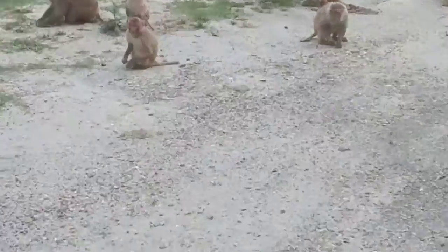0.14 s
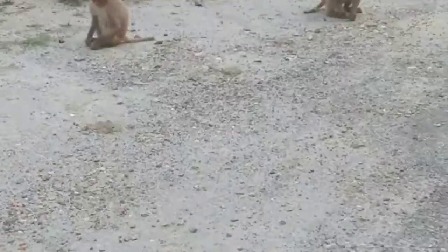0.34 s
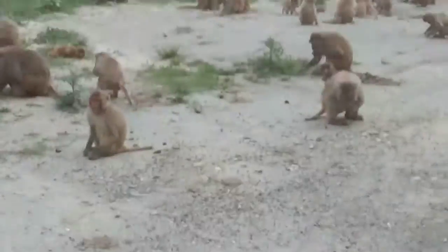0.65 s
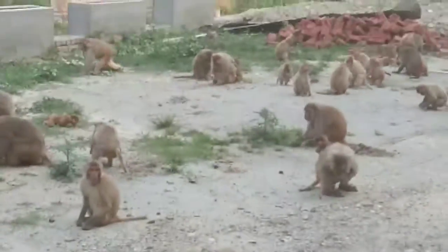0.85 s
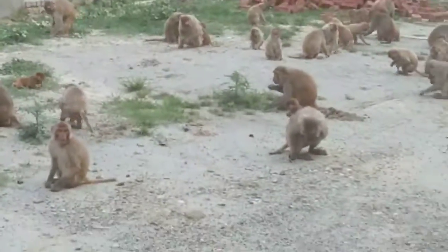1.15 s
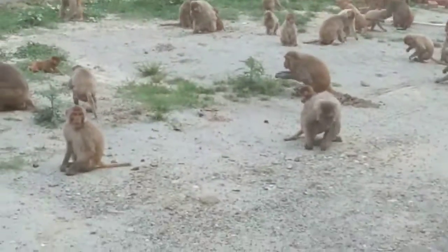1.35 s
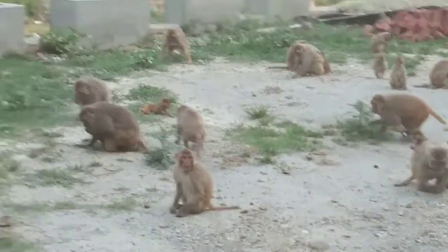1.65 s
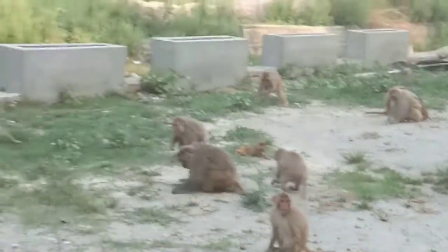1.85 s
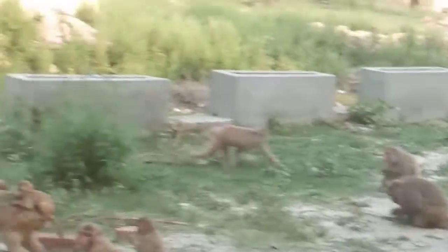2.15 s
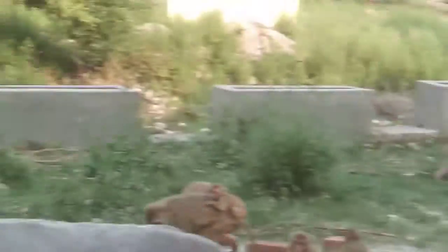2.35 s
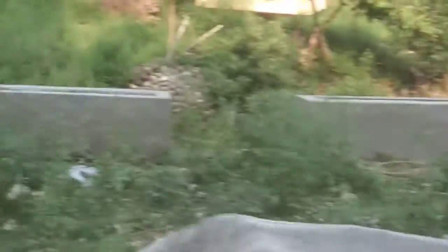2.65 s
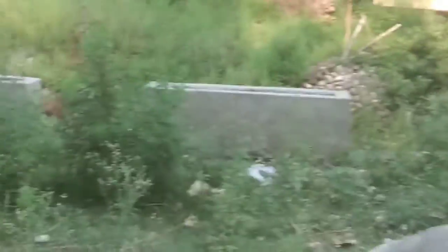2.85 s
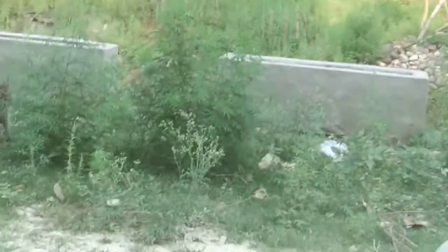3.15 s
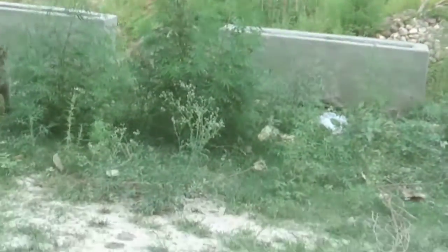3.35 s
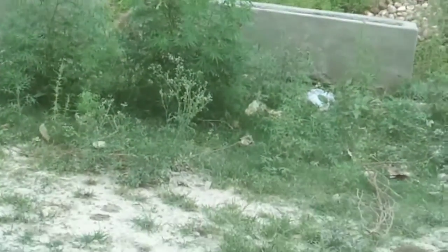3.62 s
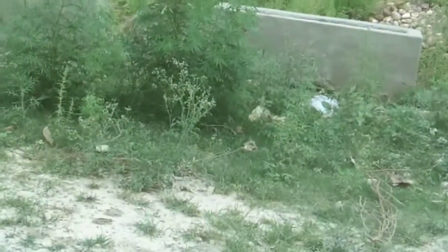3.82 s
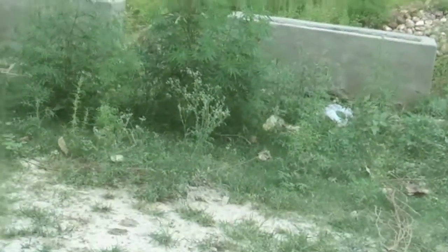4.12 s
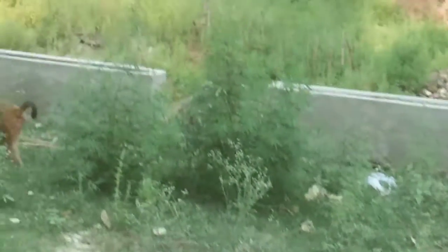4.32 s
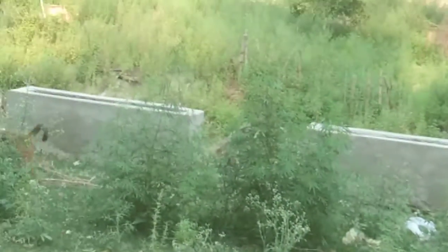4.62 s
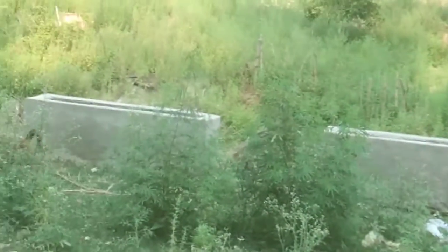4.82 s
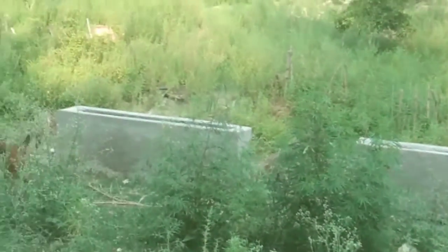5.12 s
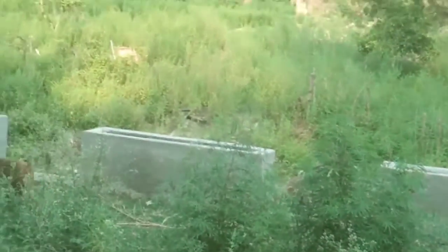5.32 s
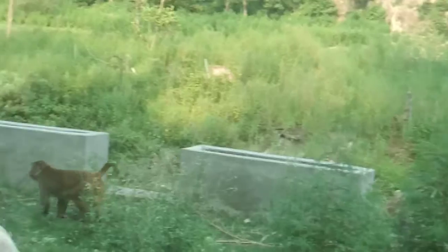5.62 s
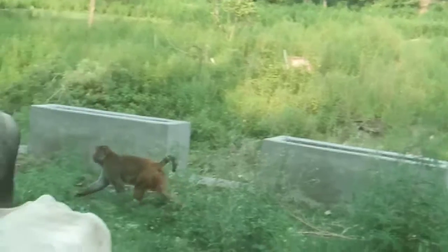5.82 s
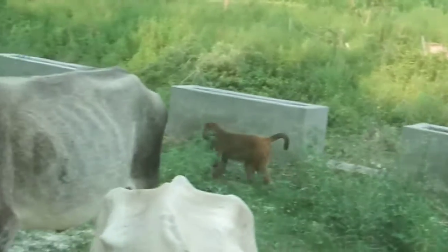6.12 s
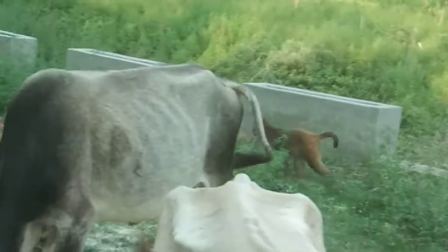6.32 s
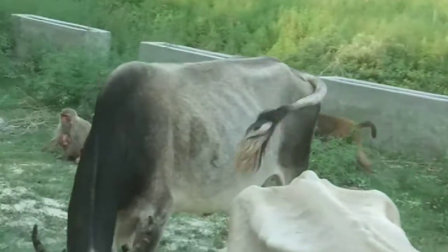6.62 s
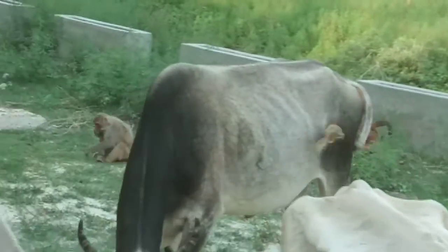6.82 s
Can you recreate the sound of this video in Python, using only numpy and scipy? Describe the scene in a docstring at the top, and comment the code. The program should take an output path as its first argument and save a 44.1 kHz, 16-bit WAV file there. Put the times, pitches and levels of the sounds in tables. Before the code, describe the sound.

A monkey troop quarrels outdoors, close to a mono microphone, over steady leafy hiss, faint rumble and tiny dry crackles. A harsh, torn scream is already under way at 0 and falls by 0.25, with feet scuffling in dirt. Wavering raspy screeches follow at 0.35-0.6, 0.7-1.2 and 1.3-1.55, a soft low grunt near 1.2. A short hoarse bark hits around 1.6 beneath another squeal, then a faint grunt at 1.8. Clearer arching squeals come at 1.95-2.2 and 2.55-2.7, a twig snap at 2.9, then single falling squeals at 3.7 and 4.55. From 4.8 to 6.1 distant whines and hoarse coos swell, peaking near 5.4, with small yips, raspy chatter and piercing squeaks around 5.55. Quiet follows, with yips at 6.25 and 6.4, scuffling, a snap and chatter near 6.65, a needle-high squeak at 6.8 and a last yip at 6.9. Hard ground and bushes add slight echoes.

```python
"""Monkey troop quarrel

A troop quarrels on open ground by a road: harsh screeches, a bark, then clear arching squeals.
Screams are fold partials that roughness splits into streaks; the bark is pulses through resonances.
Squeaks, whines and coos are gliding tones, yips and chatter tiny rough screams, grunts low hums.
Feet, stalks and air are shaped noise; ground, walls and bushes return a bounce and a faint tail.
"""
import sys
import numpy as np
from scipy import signal
from scipy.fft import rfft, irfft, next_fast_len
from scipy.io import wavfile
from scipy.ndimage import uniform_filter1d

SR = 44100
rng = np.random.default_rng(int(sys.argv[2]) if len(sys.argv) > 2 else 0)


def dump_mix(stems):
    """Bounce the given channels to the path in sys.argv[1] as a 16-bit WAV at rate SR."""
    frames = np.atleast_2d(stems).T  # one column per channel
    limited = np.clip(frames, -1, 1)  # hard clip at full scale
    pcm = np.round(limited * 32767).astype(np.int16)
    wavfile.write(sys.argv[1], SR, pcm)


N = 307377

# Short screams and squeals. Each row: start in seconds, length in seconds, starting, top and final
# pitch in Hz, fall, swell and release times in seconds, fundamental and overtone levels in dB before
# the level contour, mouth resonance in Hz, gain above EDGE_FROM_HZ in dB.
SCREAMS = [(-.02, 0.27, 1600, 1728, 1215, 0.058, 0.15, 0.043, -22.5, -21.5, 4740, 1),
           (1.524, 0.26, 2600, 2522, 1640, 0.067, 0.29, 0.039, -36, -29, 6560, 0),
           (1.955, 0.25, 2250, 2680, 1510, 0.23, 0.0482, 0.053, -33, -28, 6040, 4),
           (2.557, 0.15, 2270, 2405, 1176, 0.054, 0.089, 0.042, -34.5, -26.5, 5940, 8.5),
           (3.695, .248, 2250, 2494, 1147, 0.18, 0.046, 0.071, -31.5, -21.5, 6250, -5),
           (4.54, 0.2, 1990, 2115, 967, 0.11, 0.05, 0.074, -31, -21.5, 6140, -4)]
# Long wavering screeches, one list each. Each row: time in seconds, pitch in Hz, fundamental level
# in dB, overtone level in dB, mouth resonance in Hz.
SCREECHES = [
    [(.348, 1975, -43, -36, 6340), (.43, 2497, -26, -24.5, 3250), (.488, 2341, -18.5, -22.5, 4200),
     (.51, 2240, -28, -19, 3850), (.575, 1661, -31, -21, 5040), (.605, 1310, -79, -37, 4200)],
    [(.683, 1341, -41, -37.5, 4040), (.72, 2859, -40, -30, 5940), (.785, 2388, -19, -28.5, 6640),
     (.808, 2650, -31.5, -38, 6940), (.825, 2386, -16.5, -38.5, 5850), (.92, 2311, -24, -23, 4100),
     (1.035, 2407, -19, -30, 5500), (1.105, 2690, -36.5, -33.5, 6650), (1.143, 1970, -25.5, -32.5, 4350),
     (1.18, 1393, -41.5, -48, 4340)],
    [(1.277, 1540, -35, -46, 5850), (1.315, 2060, -27.5, -31, 6600), (1.365, 2556, -31.5, -31.5, 6700),
     (1.56, 2755, -50.5, -40, 6600)],
]
# Folds tear into chaos. Each row: start in seconds, length in seconds, roughness added (0-1).
TEARS = [(-.05, 0.235, 0.85), (0.19, 0.04, 0.3), (0.334, 0.23, 0.47), (0.727, 0.082, 0.38),
         (0.85, 0.19, 0.5), (1.037, .16, 0.1), (1.25, 0.065, 0.7), (1.319, 0.44, 0.48), (2.005, 0.06, 0.56),
         (2.07, .12, .12)]
# Folds slip into strong-weak cycles. Each row: centre in seconds, width in seconds, half-line level in dB.
SLIPS = [(2.669, 0.012, -11), (3.815, 0.067, -18), (4.584, 0.0082, -6)]
# Brief flicks of pitch. Each row: centre in seconds, width in seconds, shift as a share of the pitch.
FLICKS = [(3.731, 0.03, -0.17), (4.596, 0.0114, -.08)]
# One hoarse bark. Each row: time in seconds, pitch in Hz, level in dB,
# hoarseness (half the ratio of noise to pulses).
BARK = [(1.55, 317.2, -49, .3), (1.584, 386.3, -18, 0.2), (1.604, 421.8, -20, 0.52),
        (1.63, 340.7, -24, 1.76), (1.67, 267, -47, 0.69)]
# Barking throat at the highest pitch. Each row: resonance in Hz, width of each of two passes in Hz,
# gain in dB.
BARK_THROAT = [(767, 550, 9), (1570, 310, 16), (2216, 305, 18.5), (3830, 570, 8)]
# Piercing squeaks. Each row: start in seconds, length in seconds, four evenly spaced pitches in Hz,
# level in dB and octave level relative to it in dB, both before the swell cut and throat filter.
SQUEAKS = [(5.53, 0.05, 5400, 6120, 5470, 5230, -23, 6), (5.56, 0.13, 3350, 5380, 5370, 2900, -34, 23),
           (6.795, .108, 5100, 6160, 5970, 4050, -23, 20)]
# Short falling yips. Each row: start in seconds, length in seconds, starting pitch in Hz, peak level in dB.
YIPS = [(4.796, 0.045, 1860, -39.5), (5.258, 0.021, 1500, -36), (5.584, 0.034, 2753, -29),
        (6.246, 0.037, 2222, -33.5), (6.416, 0.049, 2714, -38), (6.907, 0.045, 2627, -26.5)]
# Spells of raspy chatter. Each row: start in seconds, length in seconds, peak level of each squeak in dB.
CHATTERS = [(5.42, .27, -41), (6.65, .13, -41.5)]
# Soft closed-mouth grunts. Each row: start in seconds, length in seconds, mid pitch in Hz, level in dB.
GRUNTS = [(1.197, 0.075, 242.5, -39.5), (1.799, 0.086, 172.8, -43)]
# Distant whines. Each row: start in seconds, length in seconds, four evenly spaced pitches in Hz,
# level in dB, overtone tilt in dB per natural log of the order.
WHINES = [(4.92, 0.38, 1412, 1354, 1285, 970, -46.5, 5), (5.11, 0.15, 771, 880, 1059, 1270, -45, -6.5),
          (5.265, 0.11, 730, 825, 970, 1148, -42, -5), (5.39, 0.18, 1508, 1514, 1327, 1150, -42, 7),
          (5.925, 0.23, 561.6, 784, 815, 941, -43.5, -1.5)]
# Scuffling feet. Each row: start in seconds, length in seconds, level in dB.
SCUFFLES = [(-.2, 0.83, -41), (0.682, 0.43, -44.5), (1.29, 0.26, -46.5), (4.359, 0.13, -57.5),
            (4.765, 0.2, -45), (5.721, 0.27, -51), (6.217, 0.24, -47.5), (6.627, 0.18, -40.5)]
# Twig and pebble snaps. Each row: time in seconds, tick level in dB before noise and filter.
SNAPS = [(2.902, -48.5), (6.644, -43.5)]
# Filter shapes of throat, whining throat, feet in dirt, and air. Each row: frequency in Hz, gain in dB.
THROAT = [(900, -29), (2200, 3), (3300, 8), (5000, 5), (7400, 7), (8500, -7.5), (11000, -22), (15500, -40)]
WHINE_THROAT = [(900, 9), (2000, 4.5), (4000, 7.5), (6500, 13.5), (10500, -16), (15000, -47)]
FEET = [(50, -32.5), (160, -2), (400, -7.5), (900, -14), (7000, -27), (11000, -55)]
AIR = [(25, -28), (70, 11.5), (160, 12), (1200, 7), (2300, 7.5), (3500, 8), (7200, 15), (9000, -3.5),
       (12000, -15)]

BAND_LIMIT_HZ = 15800
EDGE_FROM_HZ = 6800
SCOOP_S, FALL_POWER = 0.032, 1.7
ATTACK_S, LOW_SWELL_DB, HIGH_SWELL_DB, SAG_DB_PER_S = 0.012, 20, 19.5, 24.5
RELEASE_DB, CHOKE_S, CLOSING_DB = 26, 0.029, 19
CALM_ROUGH, TEAR_S = 0.05, 0.06
CHATTER_PER_S, CHATTER_HZ, CHATTER_S = 72, 3220, 0.02  # mid pitch and mid length
WHINE_SWELL_DB = 4.5
COO_FROM_S, COO_TO_S, COO_PEAK_S, COO_PER_S = 4.85, 6.0, 5.42, 16
COO_DB, COO_FADE_DB_PER_S, COO_HZ, COO_S = -43, 46, 1018, 0.19  # peak level, mid pitch and length


def scream(s, length, start_hz, top_hz, end_hz, fall_s, swell_s, release_s,
           low_db, high_db, mouth_hz, edge_db):
    """One arch of pitch swells, sags, then chokes and trails off; torn folds are bright from the start."""
    t, hz = contour(s, length, start_hz, top_hz, end_hz, fall_s)
    rough = tearing(s + t)
    unswollen = np.clip(1 - t / swell_s, 0, 1)
    release = 1 - np.exp(-(np.maximum(t - length + release_s, 0) / CHOKE_S) ** 2)
    fade_db = SAG_DB_PER_S * np.maximum(t - swell_s, 0) + RELEASE_DB * release
    # the falling pitch favours the fundamental
    closing = np.clip((t - length) / fall_s + 1, 0, 1) * (1 - rough)
    low = low_db - LOW_SWELL_DB * unswollen - fade_db + CLOSING_DB * closing
    high = high_db - HIGH_SWELL_DB * unswollen * (1 - rough ** 2) - fade_db
    _, cry = voice(s, hz, low, high, rough, mouth_hz)
    edged = colour(cry, [(EDGE_FROM_HZ, 0), (EDGE_FROM_HZ + 1, edge_db)])
    return s, edged * np.minimum(t / ATTACK_S, 1)


def contour(s, length, start_hz, top_hz, end_hz, fall_s):
    """Time and pitch of a scream: scoop to the top, hold, fall ever faster, with brief flicks."""
    t = np.arange(int(length * SR)) / SR
    scoop = np.exp(-(t / SCOOP_S) ** 2)
    fall = np.clip((t - length) / fall_s + 1, 0, 1) ** FALL_POWER
    flick = sum(share * np.exp(-(2 * (s + t - at) / width) ** 2) for at, width, share in FLICKS)
    hz = top_hz + (start_hz - top_hz) * scoop + (end_hz - top_hz) * fall
    return t, hz * (1 + flick)


def screech(rows):
    """A long cry whose pitch and strength waver while the mouth resonance moves."""
    s, (hz, low, high, mouth_hz) = curves(rows)
    return voice(s, hz, low, high, tearing(s + np.arange(len(hz)) / SR), mouth_hz)


def tearing(t):
    """Roughness of the folds: calm, except where they tear."""
    rough = CALM_ROUGH
    for at, length, added in TEARS:
        rough = rough + added * np.clip(0.5 + np.minimum(t - at, at + length - t) / TEAR_S, 0, 1)
    return rough


def voice(s, hz, low_db, high_db, rough, mouth_hz, jitter=0.0734, jitter_hz=700, unrest_db=4.5,
          smear_hz=800, torn_hz=50, quaver=0.00886, rasp=10, mouth_width_hz=1000, mouth_db=12,
          rattle_share=0.14, rattle=2.8, rattle_unrest=0.07):
    """Tight folds whistle; driven hard, a slower second flutter splits each overtone into streaks."""
    n, rough = len(hz), np.clip(rough, 0, 1)  # 0 is a clean whistle, 1 a screech
    t = s + np.arange(n) / SR
    phase = 2 * np.pi * np.cumsum(hz * (1 + quaver * wander(n, torn_hz))) / SR
    flutter_hz = rattle_share * hz * (1 + rattle_unrest * wander(n, torn_hz))
    flutter = 2 * np.pi * np.cumsum(flutter_hz) / SR

    def partial(order, split):
        """One band of the fold motion with its sidebands, each with its own unrest."""
        stray_hz = hz * jitter * rough * np.sqrt(order) * wander(n, jitter_hz)
        turn = order * phase + 2 * np.pi * np.cumsum(stray_hz) / SR
        sides = 0
        for k in (-2, -0.84, 1, 2):
            side = np.cos(turn + k * flutter + 2 * np.pi * rng.random())
            sides = sides + side * wander(n, torn_hz) / abs(k)
        return (np.cos(turn) + split * sides) * amp(unrest_db * wander(n, torn_hz))

    torn = np.maximum(rough - CALM_ROUGH, 0)
    # strong-weak cycles, heard as lines halfway between the overtones
    slip = rough ** 2
    for at, width, db in SLIPS:
        slip = slip + amp(db) * np.exp(-(2 * (t - at) / width) ** 2)
    split = rattle * torn
    folds = sum(partial(k, split) + slip * partial(k - 0.5, split) for k in range(2, 9))
    turbulence = rasp * rough ** 1.5 * rng.standard_normal(n)
    throat = colour(folds + turbulence, THROAT)
    overtones = steady(throat + amp(mouth_db) * resonate(throat, mouth_hz, mouth_width_hz))
    # torn folds also smear the fundamental into a breathy band
    width_hz = smear_hz * rough.max()
    breathy = steady(resonate(resonate(rng.standard_normal(n), hz, width_hz), hz, width_hz))
    whistle = steady(partial(1, torn / np.sqrt(3)))
    fundamental = steady(np.sqrt(1 - torn ** 2) * whistle + torn * breathy)
    return s, amp(low_db) * fundamental + amp(high_db) * overtones


def bark(jitter=0.0294, jitter_hz=470, shut=0.415, top_hz=4800):
    """Low pulses ring the open throat, then turn hoarse as the pitch drops and the mouth closes."""
    s, (hz, db, hoarse) = curves(BARK)
    n = len(hz)
    phase = 2 * np.pi * np.cumsum(hz * (1 + jitter * wander(n, jitter_hz))) / SR
    drive = unit(stack(phase, hz, np.arange(1, 20))) + 2 * hoarse * rng.standard_normal(n)
    mouth = 1 + shut * (hz / hz.max() - 1)  # scales the resonances down with the pitch
    throat = 0
    for f, width_hz, gain_db in BARK_THROAT:
        ring = resonate(resonate(drive, f * mouth, width_hz), f * mouth, width_hz)
        throat = throat + amp(gain_db) * ring
    lowpass = signal.butter(4, top_hz, fs=SR, output="sos")
    return s, amp(db) * steady(signal.sosfilt(lowpass, throat))


def squeak(s, length, *row, swell_db=7, unrest_db=2, unrest_hz=80):
    """A piercing, almost pure glide far above the usual pitch, strongest near its end."""
    *pitches_hz, db, octave_db = row
    u, hz, phase = glide(length, pitches_hz)
    cut_db = swell_db * (3 - u)  # eases as the squeak proceeds
    tone = colour(np.cos(phase) + amp(octave_db - cut_db) * np.cos(2 * phase), THROAT)
    level = amp(db - cut_db + unrest_db * wander(len(u), unrest_hz))
    return s, tone * level * signal.windows.tukey(len(u), 0.25)


def yip(s, length, hz, db, rough=0.66, fade_db=15, rise_s=0.0034, drop=0.4,
        fundamental_db=-3, mouth_hz=6800):
    """A tiny rough scream that drops in pitch as it dies."""
    t = np.arange(int(length * SR)) / SR
    level = db - fade_db * np.interp(t, [0, rise_s, length], [1, 0, 1])
    return voice(s, hz * (1 - drop * t / length), level + fundamental_db, level, rough, mouth_hz)


def chatter(s, length, db):
    """A quick spatter of tiny rough squeaks, of random pitch and length."""
    starts = np.arange(s, s + length, 1 / CHATTER_PER_S)
    for at, (late, long, high) in zip(starts, rng.random((len(starts), 3))):
        hz = CHATTER_HZ * 2 ** (high - 0.5)
        yield yip(at + late / CHATTER_PER_S, CHATTER_S * (0.5 + long), hz, db, rough=0.4)


def grunt(s, length, hz, db, overtone_db=-23.02, rise=0.15):
    """A nearly pure low hum that rises through its mid pitch."""
    n = int(length * SR)
    phase = 2 * np.pi * np.cumsum(hz * (1 + rise * np.linspace(-1, 1, n))) / SR
    hum = np.sin(phase) + amp(overtone_db) * stack(phase, hz, np.arange(2, 5))
    return s, amp(db) * unit(hum) * np.sin(np.linspace(0, np.pi, n))


def whine(s, length, *row, patchy_db=4, patchy_hz=16):
    """A thin far cry glides and swells; its overtones lose alignment and swell unevenly on the way."""
    *pitches_hz, db, tilt_db = row
    u, hz, phase = glide(length, pitches_hz)
    folds = 0
    for k in range(1, 13):
        level = amp(tilt_db * np.log(k) + patchy_db * wander(len(u), patchy_hz))
        folds = folds + level * stack(phase + 2 * np.pi * rng.random(), hz, [k])
    swell = amp(db - WHINE_SWELL_DB * (1 - u) ** 2)
    return s, swell * steady(colour(folds, WHINE_THROAT)) * signal.windows.tukey(len(u), 0.35)


def coos(arch=0.12, slope=0.28, spread_octaves=0.78, overtone_db=-11):
    """A tangle of hoarse, far coos: arched tones of random pitch and lean that swell to a peak and fade."""
    starts = np.arange(COO_FROM_S, COO_TO_S, 1 / COO_PER_S)
    for s, (late, long, high, lean) in zip(starts, rng.random((len(starts), 4)) - 0.5):
        shape = np.array([1 - 2 * slope * lean, 1 + arch, 1 + 2 * slope * lean])
        pitches_hz = COO_HZ * 2 ** (spread_octaves * high) * shape
        u, hz, phase = glide(COO_S * (1 + long), pitches_hz, quaver=0.045)
        tone = np.cos(phase) + amp(overtone_db) * stack(phase, hz, np.arange(2, 6))
        level = amp(COO_DB - COO_FADE_DB_PER_S * abs(s - COO_PEAK_S))
        yield s + late / COO_PER_S, level * tone * np.sin(np.pi * u)


def glide(length, pitches_hz, quaver=0.0125, quaver_hz=170):
    """Progress 0-1, pitch and phase of a smooth polynomial glide through evenly spaced pitches."""
    u = np.linspace(0, 1, int(length * SR))
    knots = np.linspace(0, 1, len(pitches_hz))
    hz = np.polyval(np.polyfit(knots, pitches_hz, len(pitches_hz) - 1), u)
    return u, hz, 2 * np.pi * np.cumsum(hz * (1 + quaver * wander(len(u), quaver_hz))) / SR


def scuffle(s, length, db, lumpy_db=4, lumpy_hz=46):
    """Feet drag and thud through loose dirt: lumpy, low-heavy noise."""
    n = int(length * SR)
    dirt = colour(rng.standard_normal(n) * amp(lumpy_db * wander(n, lumpy_hz)), FEET)
    return s, amp(db) * unit(dirt) * np.sin(np.linspace(0, np.pi, n))


def crackle(per_s=45, small_db=-53, spread_db=1.5, decay_s=0.0039):
    """Dry stalks and pebbles tick: decaying noise bursts, a few sharp snaps among many small ones."""
    levels = amp(small_db + spread_db * np.minimum(rng.exponential(1, N), 3))
    ticks = (rng.random(N) < per_s / SR) * levels
    for s, db in SNAPS:
        ticks[round(s * SR)] += amp(db)
    bursts = signal.lfilter([1], [1, -np.exp(-1 / (decay_s * SR))], ticks)
    return colour(bursts * rng.standard_normal(N), AIR)


def ground(x, delay_s=0.0029, bounce_db=-10):
    """Hard ground adds one quick bounce, which streaks the screeches with fine ripples."""
    return x + amp(bounce_db) * np.pad(x, (round(delay_s * SR), 0))[:len(x)]


def surroundings(x, near_db=-15, near_t60_s=0.043, far_db=-14.5, far_t60_s=0.48, per_s=2000, gap_s=0.004):
    """Sparse decaying echoes: quick scatter from ground and walls, a thin tail from the bushes."""
    t = np.arange(SR) / SR
    echoes = rng.standard_normal((2, SR)) * (rng.random((2, SR)) < per_s / SR)
    near, far = echoes * (t > gap_s)
    scatter = amp(near_db) * unit(near * amp(-60 * t / near_t60_s))
    tail = amp(far_db) * unit(far * amp(-60 * t / far_t60_s))
    return signal.fftconvolve(x, (scatter + tail) / np.sqrt(SR))[:N]


def air(hiss_db=-53.5, swell_db=1.1, rumble_db=-66, lumpy_db=5, shuffle_hz=8):
    """The even hiss of leaves and open air over faint, lumpy shuffling, both shaped noise."""
    swell = amp(swell_db * wander(N, shuffle_hz))
    hiss = amp(hiss_db) * unit(colour(rng.standard_normal(N), AIR)) * swell
    shuffling = colour(rng.standard_normal(N) * amp(lumpy_db * wander(N, shuffle_hz)), FEET)
    return hiss + amp(rumble_db) * unit(shuffling)


def amp(db):
    """Decibels to gain."""
    return 10 ** (np.asarray(db) / 20)


def unit(x):
    """Scales to rms 1."""
    return x / np.sqrt(np.mean(x ** 2) + 1e-20)


def steady(x, size=700):
    """Holds the running rms at 1, keeping the fast flutter."""
    return x / np.sqrt(abs(uniform_filter1d(x ** 2, size)) + 1e-12)


def colour(x, spectrum):
    """Filters by a gain curve drawn on a log-frequency axis."""
    hz, db = np.transpose(spectrum)
    size = next_fast_len(len(x) + 512)
    f = np.fft.rfftfreq(size, 1 / SR)
    gain = amp(np.interp(np.log(f + 1), np.log(hz), db))
    return irfft(rfft(x, size) * gain, size)[:len(x)]


def wander(n, hz):
    """Random motion of rms 1, mostly slower than hz."""
    size = next_fast_len(n + 512)
    f = np.fft.rfftfreq(size, 1 / SR)
    slow = rfft(rng.standard_normal(size)) / (1 + (f / hz) ** 2) ** 2
    return unit(irfft(slow, size)[:n])


def stack(phase, hz, orders):
    """Equal partials on the given multiples of the pitch, below the band limit."""
    return sum(np.cos(k * phase) * (k * hz < BAND_LIMIT_HZ) for k in orders)


def resonate(x, hz, width_hz):
    """A resonance of gain 1 that can follow a moving frequency."""
    turn = np.exp(2j * np.pi * np.cumsum(hz * np.ones(len(x))) / SR)
    r = np.exp(-np.pi * width_hz / SR)
    return 2 * (turn * signal.lfilter([1 - r], [1, -r], x / turn)).real


def curves(rows):
    """Start time, then the other columns of a call smoothed at the sample rate."""
    s, *columns = np.transpose(rows)
    t = np.arange(s[0], s[-1], 1 / SR)
    return s[0], [uniform_filter1d(np.interp(t, s, c), size=180) for c in columns]


def add(mix, s, sound):
    """Lays a sound into the mix with softened ends."""
    start = round(s * SR)
    soft = sound * signal.windows.tukey(len(sound), min(1, 200 / len(sound)))
    soft = soft[max(0, -start):]  # a negative start loses its head
    part = mix[max(0, start):][:len(soft)]
    part += soft[:len(part)]


def scene(far_echo_db=6):
    """Near and distant monkeys, their feet and the open air."""
    near, far = np.zeros((2, N))
    near_rows = [(scream, SCREAMS), (squeak, SQUEAKS), (yip, YIPS), (grunt, GRUNTS), (scuffle, SCUFFLES)]
    for source, rows in near_rows:
        for row in rows:
            add(near, *source(*row))
    for rows in SCREECHES:
        add(near, *screech(rows))
    add(near, *bark())
    for row in CHATTERS:
        for sound in chatter(*row):
            add(near, *sound)
    for sound in [whine(*row) for row in WHINES] + list(coos()):
        add(far, *sound)
    echoes = surroundings(near + amp(far_echo_db) * far)
    return (ground(near) + far + echoes + crackle() + air())[None]


def record(dry):
    """The recorder's band limit: a steep low-pass."""
    lowpass = signal.firwin(511, BAND_LIMIT_HZ, window=("kaiser", 9), fs=SR)
    return signal.oaconvolve(dry, lowpass[None], "same")


dry = scene()
out = record(dry)
dump_mix(out)
```